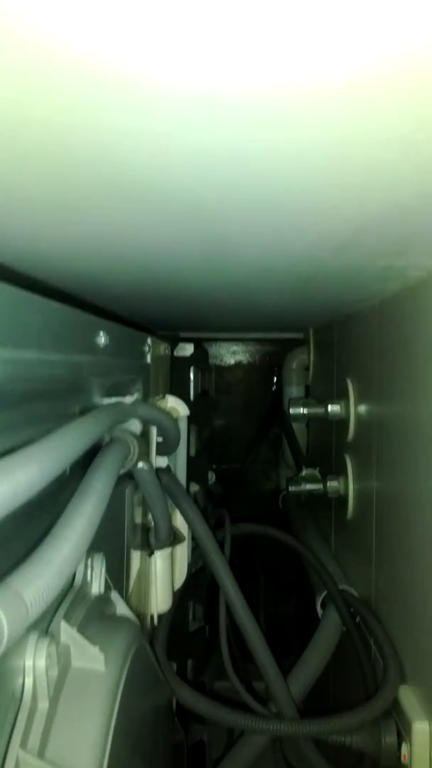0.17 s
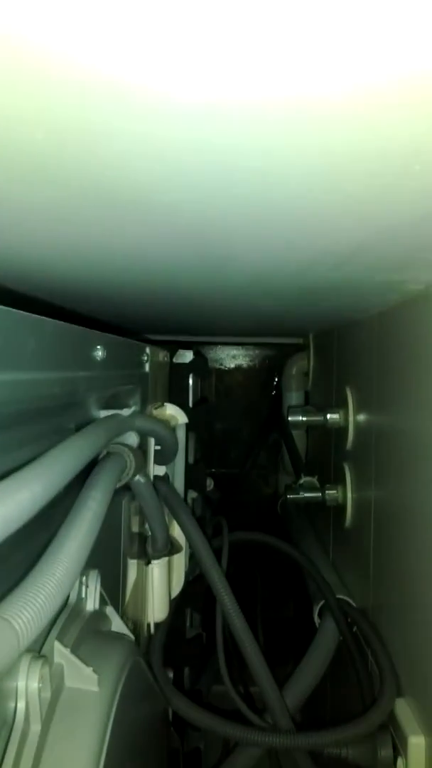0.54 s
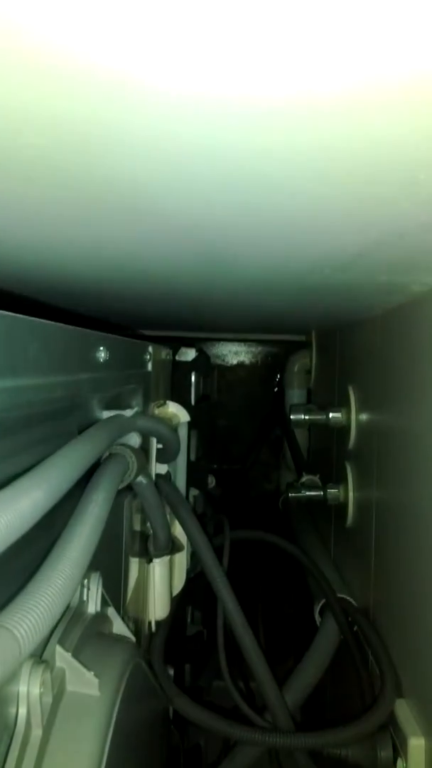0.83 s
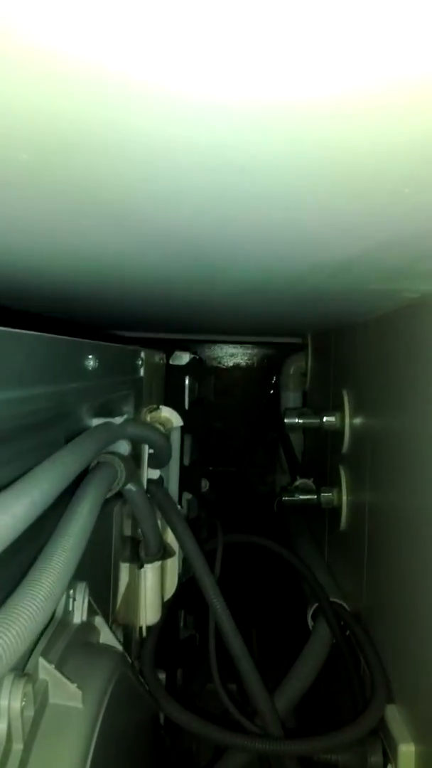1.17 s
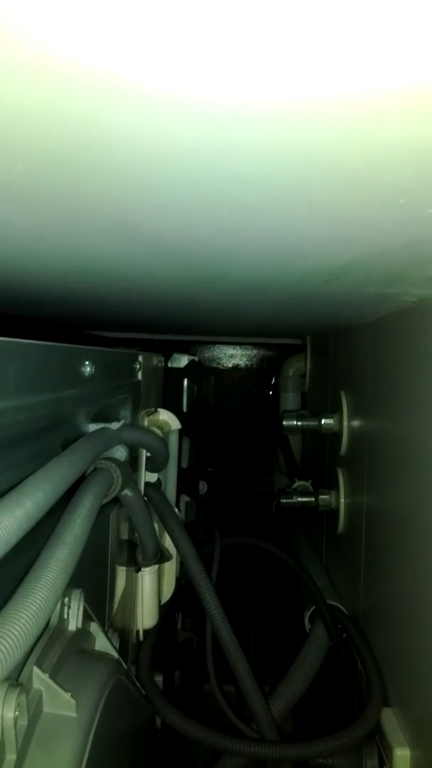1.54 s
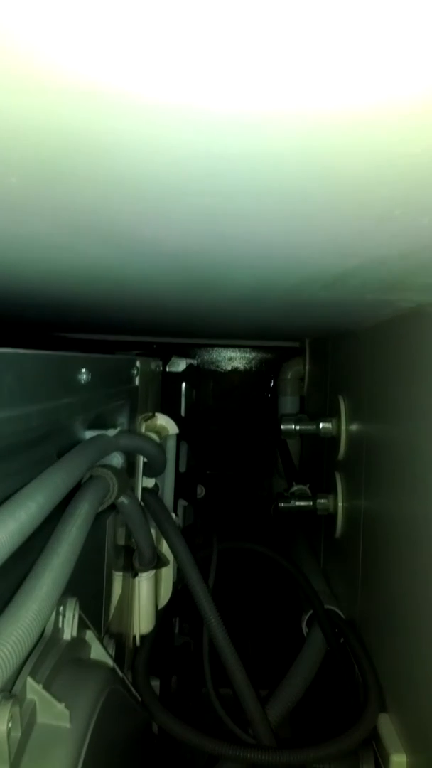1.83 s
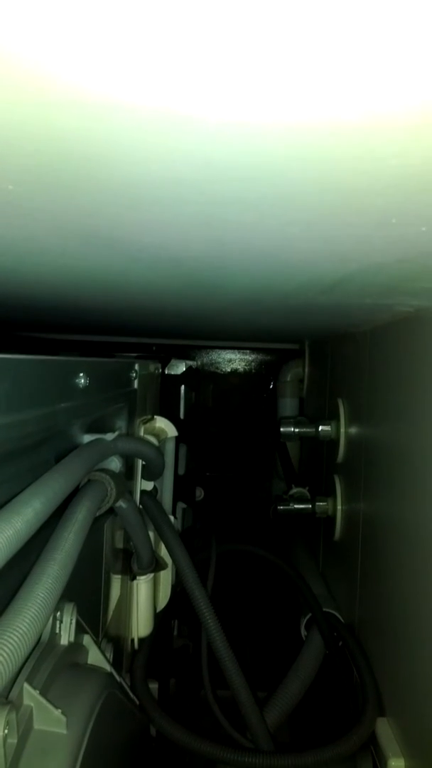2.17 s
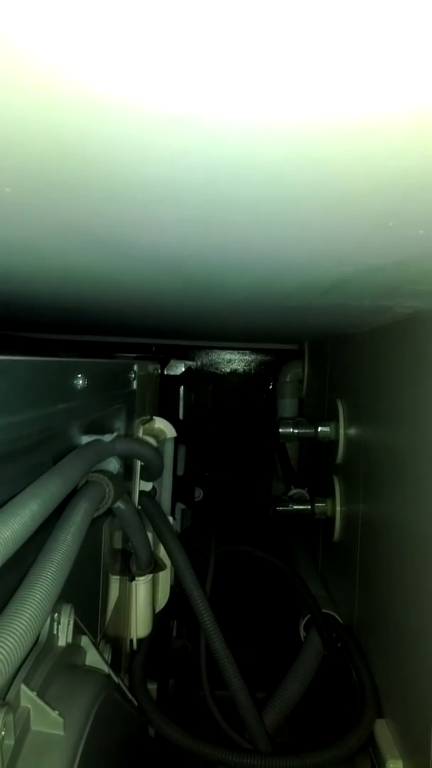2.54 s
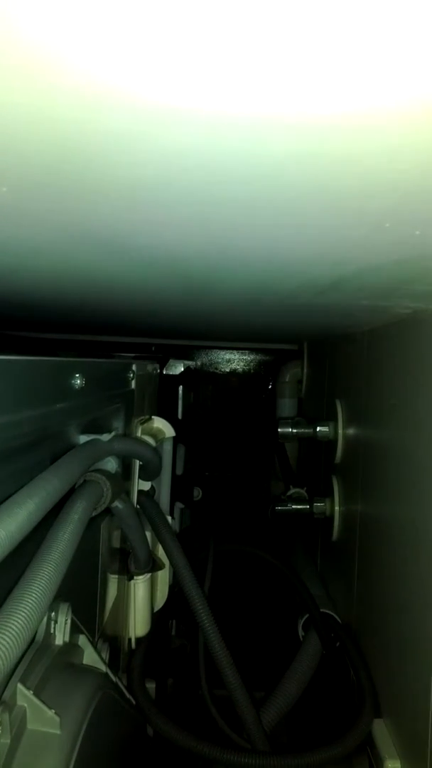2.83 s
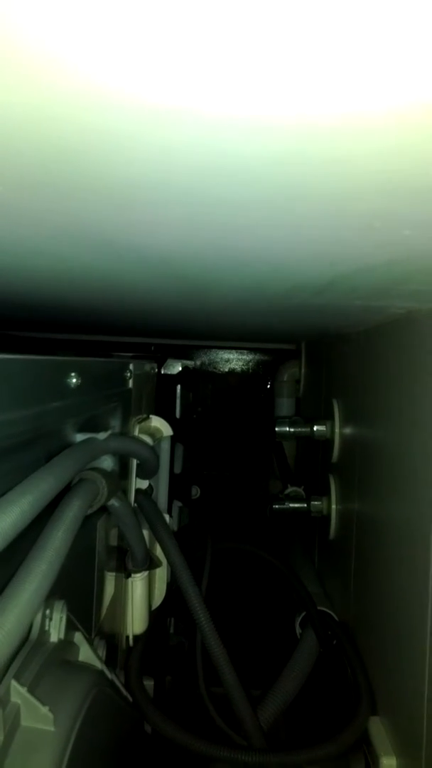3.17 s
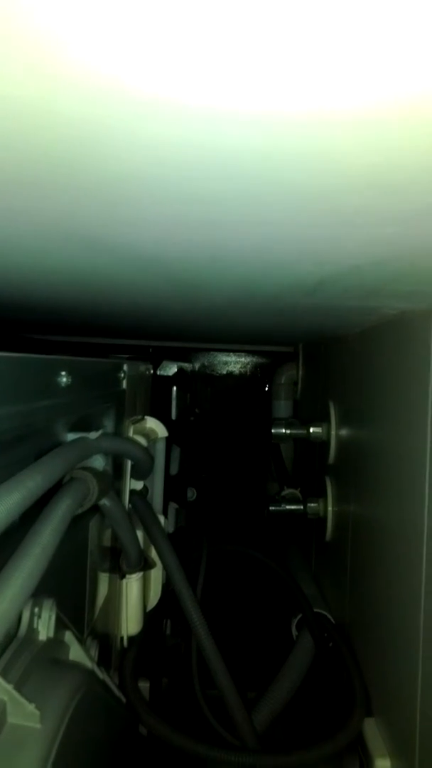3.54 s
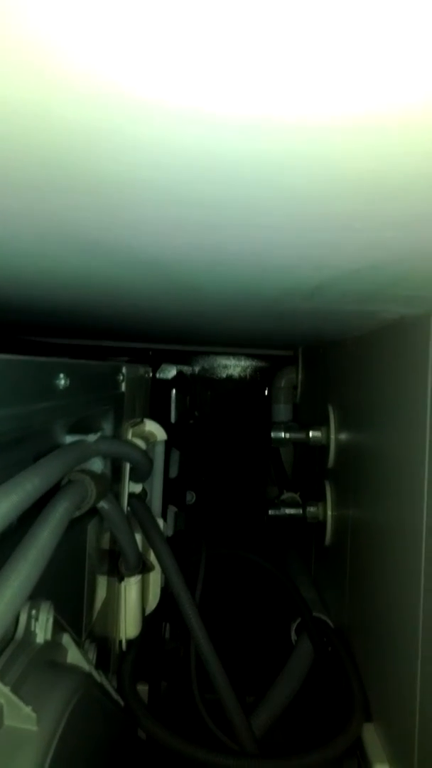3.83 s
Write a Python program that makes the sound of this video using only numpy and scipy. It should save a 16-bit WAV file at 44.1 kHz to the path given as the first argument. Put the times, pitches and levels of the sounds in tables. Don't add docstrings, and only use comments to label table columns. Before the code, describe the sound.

A washing machine drain pump hums low and buzzy with rushing, fizzing water, small drips, spits and squeaks from 0 to 2.0 seconds. It cuts out, its hum ringing down while water gurgles back in hollow gulps until about 2.7. A sharp plastic click follows at 2.74, a panel knock at 3.34, a fainter one at 3.53. Quiet compressor drone, rapid ticking and valve hiss continue throughout, close in a narrow gap.

```python
import sys
import numpy as np
from scipy import signal
from scipy.fft import rfft, irfft
from scipy.io import wavfile

SR = 44100
rng = np.random.default_rng(int(sys.argv[2]) if len(sys.argv) > 2 else 0)


def dump_mix(stems):
    frames = np.atleast_2d(stems).T
    limited = np.clip(frames, -1, 1)
    pcm = np.round(limited * 32767).astype(np.int16)
    wavfile.write(sys.argv[1], SR, pcm)


def boost(x):
    u = np.asarray(x, float) / 20
    return 10 ** u


N = 176400
T = np.arange(N) / SR

HUM_HZ = 99.78
PUMP_OFF_S, FLOW_OFF_S = 2.022, 2
FLOW_FALL_S, CHURN_FALL_S = 0.02, 0.07
PUMP_LEAD_RAD, DRONE_LAG_RAD, ROTOR_LAG_RAD = 1.43, 2.44, .6
FIRST_DROP_DB, FIRST_DROP_S = -5, .04
HUM_LEFT_DB = -51
TICK_HZ, TICK_FIRST_S = 15.35, .0163
RUSH_DB, FIZZ_DB, FIZZ_PER_S, CHURN_DB = -41.5, -50, 1300, -36.5
ROOM_LOW_DB, HISS_DB = -47.5, -45.5
GLUGS_PER_S, TRICKLE_PER_S = 490, 2600
LOW_MODES_HZ, LOW_LAG_S = 1150, .006
PANEL_RISE_S, CLIP_RISE_S = .004, .001
SWELL_S, GLIDE, POCKET_DB = .009, 0.017, -0.5

# (multiple of hum, level/dB rms, ring-down t60/s, wobble/dB)
PUMP_PARTIALS = [(1, -22, 1.2, 0.1), (2, -30.5, 2.72, -1.5), (3, -34, 0.2, 2), (4, -49, 0.37, 0.2),
                 (5, -58, .3, 2.5), (6, -74, .3, 0), (7, -62, .3, 2.5)]
# (multiple of hum, level/dB)
DRONE_PARTIALS = [(1, -53), (3, -42), (4, -54.5), (5, -63.5)]
# (f/Hz, level/dB, sense of swing)
ROTOR_LINES = [(42.18, -56, 1), (48.66, -41, 1), (94.19, -47.5, -1)]
# (f/Hz, level/dB, wobble/dB)
WINDING_WHINE = [(146, -66, 2.1), (276, -62, 2.5), (452.4, -66, 2.5), (3492, -67, 2.2), (3866, -69, 3.5),
                 (5553, -66, 3)]
# (f/Hz, level/dB, t60/s, lag/s)
TICK_PARTS = [(1905, -59, 0.1, .002), (1965, -58, 0.11, .006), (2905, -57, 0.06, 0),
              (3870, -62, 0.14, .045), (4870, -57, 0.042, 0)]
# (f/Hz, level/dB per Hz)
RUSH_SPECTRUM = [(290, -15), (500, -7.5), (652, -18), (716, 1.5), (1170, -6), (3220, 1), (4730, -2),
                 (5780, -7.5), (12000, -11), (15600, -9), (22000, -120)]
# (t/s, level/dB)
FLOW_SURGE = [(0, -41.5), (.05, -43), (.15, -40.5), (.27, -43.5), (.36, -42), (.44, -41.5), (.52, -42.5),
              (.6, -42.5), (.8, -41), (.88, -40.5), (.98, -43), (1.07, -42), (1.17, -42.5), (1.45, -42),
              (1.58, -44), (1.8, -41), (1.9, -42.5), (2, -44)]
# (f/Hz, level/dB per Hz)
CHURN_SPECTRUM = [(40, -24), (70, 2), (125, -7), (165, 5), (245, -8.5), (355, -6.5), (450, -15),
                  (700, -22.5)]
# (f/Hz, level/dB)
CHURN_LUMPS = [(152, -47), (170, -48.5), (220, -48), (358, -49.5)]
# (f/Hz, level/dB per Hz)
ROOM_SPECTRUM = [(15, -14), (40, 1.5), (68, 6), (150, -14.5), (280, -3.5), (420, -10.5), (570, -5.5),
                 (780, -24)]
# (f/Hz, level/dB per Hz)
HISS_SPECTRUM = [(700, -15.5), (1200, -8), (2200, -12.5), (5300, -9), (6800, -15.5), (12000, -10),
                 (13600, -1), (15700, -6)]
# (f/Hz, width/Hz, level/dB)
GAP_PEAKS = [(557, 45, 6.5), (1140, 300, 3.5), (2480, 44, 9), (4120, 320, 3), (5800, 50, -5),
             (7190, 110, 9), (8600, 200, 0.5), (8890, 270, 6), (11340, 250, 5.5), (11940, 250, 4.5),
             (13600, 440, 3), (14800, 310, 0.5), (15000, 350, 0.5)]
# (t/s, level/dB)
DRIP_HITS = [
    (.003, -41),
    (.684, -40),
]
# (f/Hz, level/dB, t60/s)
DRIP_RINGS = [(1027, 5.5, 0.16), (1360, -2, .1)]
# (t/s, level/dB)
HARD_HITS = [
    (3.3385, -27),
]
# (f/Hz, level/dB, t60/s)
HARD_RINGS = [(1046, -13, .25), (1620, 4, .035), (1357, 0, .13), (1420, -5, .12), (1468, -5, .1),
              (1525, -7, .12), (1595, -5, .13), (1690, -4, .14), (1722, 2, .12), (1776, -7, .38),
              (1883, -3, .24), (2043, -14, .12), (2176, -11, .12), (2492, -18, .15)]
# (t/s, level/dB)
SOFT_HITS = [
    (3.5297, -42),
]
# (f/Hz, level/dB, t60/s)
SOFT_RINGS = [(994, -3, .22), (1080, -5, .1), (1227, -9, .08), (1357, -1, .13), (1427, -1, .09),
              (1480, 3, .04), (1464, -1, .12), (1595, -7, .06), (1692, -9, .15)]
# (t/s, level/dB)
CLIP_HITS = [
    (2.7421, -31),
    (2.7428, -25),
]
# (f/Hz, level/dB, t60/s)
CLIP_RINGS = [(8900, -4, .008), (9700, 0, .013), (10500, -3, .008)]
# (t/s, level/dB, low f/Hz, high f/Hz, t60/s)
CRACKS = [(.13, -42, 2800, 3700, .3), (.135, -35, 9500, 16000, .12), (.508, -41, 2500, 3800, 0.14),
          (.855, -38, 2800, 4500, .15), (1.05, -45, 2700, 4200, .15), (1.892, -37, 1800, 4300, 0.11),
          (2.053, -35, 9400, 11300, .014), (2.11, -44.5, 3800, 5800, 0.17), (2.174, -40, 9000, 15700, 0.17),
          (2.265, -46, 5500, 8000, 0.11), (2.388, -44, 700, 4000, 0.15), (2.69, -49, 900, 3500, 0.35),
          (2.743, -38.5, 8400, 12400, .09), (2.742, -37, 4500, 15000, .02), (2.965, -40, 120, 250, .4),
          (3.339, -35, 2300, 6900, 0.12), (3.339, -41, 5150, 5270, .08), (3.338, -37, 1410, 1940, 0.48),
          (3.531, -46, 1300, 2600, 0.11)]
# (peak t/s, level/dB, f/Hz)
SEAL_SQUEAKS = [
    (.359, -41, 4587),
    (.363, -46, 3004),
    (.784, -47, 3671),
    (.255, -48, 1550),
]
# (peak t/s, level/dB, f/Hz)
SUMP_GULPS = [(2.107, -40, 388), (2.127, -36, 375), (2.197, -35, 385), (2.247, -29.5, 386),
              (2.259, -33, 219), (2.287, -31, 388), (2.319, -35, 207), (2.347, -38, 388), (2.347, -33, 205),
              (2.377, -30, 222), (2.405, -37, 398), (2.419, -44, 484), (2.424, -37, 170), (2.442, -40, 443),
              (2.46, -41, 445), (2.49, -37, 172), (2.524, -41, 161)]
# (peak t/s, level/dB, f/Hz)
HOSE_BUBBLES = [(2.113, -44.5, 590), (2.127, -46, 614), (2.127, -44, 790), (2.219, -45, 743),
                (2.243, -41, 710), (2.255, -41, 725), (2.271, -39, 750), (2.283, -54, 1100),
                (2.303, -43, 736), (2.305, -52, 1270), (2.305, -44, 1590), (2.319, -47, 1780),
                (2.331, -45, 732), (2.335, -46, 1540), (2.393, -36, 740), (2.395, -49, 1460),
                (2.395, -45, 1981), (2.395, -45, 896), (2.397, -45, 1124), (2.405, -45, 1470),
                (2.415, -48, 1174), (2.43, -49, 1740), (2.438, -45, 732), (2.454, -49, 1100),
                (2.48, -46, 1016), (2.48, -45, 1895), (2.486, -41, 734), (2.494, -50, 1012),
                (2.496, -49, 1443), (2.506, -47, 1044), (2.516, -45, 1270), (2.548, -42.5, 1152),
                (2.554, -44, 710), (2.58, -49, 1087), (2.61, -49, 1110), (2.616, -46, 1787)]
# (t/s, level/dB, trickle level/dB)
BACKFLOW_COURSE = [
    (2.07, -53, -2),
    (2.11, -40.5, -8.5),
    (2.19, -39.5, -11),
    (2.29, -39.5, -6),
    (2.37, -42, -9),
    (2.395, -39.5, -4),
    (2.5, -39.5, -5.5),
    (2.6, -46, -2.5),
    (2.85, -59.5, -3),
]
# (f/Hz, level/dB, t60/s)
SUMP_RINGS = [(147, -4.5, 0.056), (180, -8, 0.034), (235, -9, 0.047), (326, -2, 0.063), (398, -12, 0.076),
              (453, -6, 0.043), (584, -12, 0.026), (733, -9.5, 0.063)]


def rms_one(x):
    return x / np.sqrt(np.mean(x ** 2) + 1e-20)


def drift(rate_hz):
    r = np.exp(-80 * np.pi * rate_hz / SR)
    noise = rng.standard_normal(N // 40 + 2002)
    slow = signal.lfilter([1], [1, -2 * r, r * r], noise)[2000:]
    return np.interp(np.arange(N) / 40, np.arange(len(slow)), rms_one(slow))


def ring(clicks, hz, t60):
    r, w = boost(-60 / (t60 * SR)), 2 * np.pi * hz / SR
    return signal.lfilter([0, np.sin(w)], [1, -2 * r * np.cos(w), r * r], clicks + 1e-18)


def coloured(spectrum, patchy_db):
    hz = np.fft.rfftfreq(N, 1 / SR) + 1
    at, db = np.transpose(spectrum)
    curve = np.interp(np.log(hz), np.log(at), db, -90, -90)
    shaped = rfft(rng.standard_normal(N)) * boost(curve)
    out, together = 0, drift(19.0)
    for centre in np.arange(np.log2(at[0]), np.log2(at[-1]) + .5, .5):
        window = np.clip(1 - 2 * abs(np.log2(hz) - centre), 0, 1)
        band = irfft(shaped * window, N)
        out = out + band * boost(patchy_db * (0.17 * together + drift(10.5)))
    return rms_one(out)


def grains(per_s, spread_db):
    sizes = boost(spread_db * np.minimum(rng.exponential(1, N), 4)) * rng.choice([-1, 1], N)
    return sizes * (rng.random(N) < per_s / SR)


def bubble_bank(born, pitches_hz, cycles):
    dealt = rng.integers(0, len(pitches_hz), N)
    return sum(ring(born * (dealt == k), hz, cycles / hz) for k, hz in enumerate(pitches_hz))


def pump():
    after = np.maximum(T - PUMP_OFF_S, 0)
    step = FIRST_DROP_DB * (1 - np.exp(-after / FIRST_DROP_S))
    phase = 2 * np.pi * HUM_HZ * T + PUMP_LEAD_RAD
    out = np.zeros(N)
    for k, db, t60, wobble_db in PUMP_PARTIALS:
        level = boost(db + step - 60 * after / t60 + wobble_db * drift(2.6))
        if k == 2:
            level = level - boost(HUM_LEFT_DB)
        out -= np.sqrt(2) * level * np.sin(k * phase)
    return out


def compressor():
    out = np.zeros(N)
    for k, db in DRONE_PARTIALS:
        out += boost(db + 0.79 * drift(8.7)) * np.sin(k * (2 * np.pi * HUM_HZ * T - DRONE_LAG_RAD))
    for hz, db, sense in ROTOR_LINES:
        out += sense * boost(db + 0.2 * drift(2.2)) * np.sin(2 * np.pi * hz * T - ROTOR_LAG_RAD)
    for hz, db, wobble_db in WINDING_WHINE:
        out += boost(db + wobble_db * drift(8.2)) * np.sin(2 * np.pi * hz * T)
    at = (np.arange(TICK_FIRST_S, N / SR, 1 / TICK_HZ) * SR).astype(int)
    for hz, db, t60, lag in TICK_PARTS:
        clicks = np.zeros(N)
        late = (SR * (lag + rng.uniform(0, .004, len(at)))).astype(int)
        clicks[(at + late) % N] = boost(db + rng.normal(0, 1.6, len(at)))
        out += ring(clicks, hz, t60)
    return np.sqrt(2) * out


def outflow():
    s, db = np.transpose(FLOW_SURGE)
    surge = boost(np.interp(T, s, db - db.mean()))
    flowing = np.exp(-np.maximum(T - FLOW_OFF_S, 0) / FLOW_FALL_S)
    churning = np.exp(-np.maximum(T - PUMP_OFF_S, 0) / CHURN_FALL_S)
    born = grains(FIZZ_PER_S * boost(2.5 * drift(8)), 4.1)
    fizz = bubble_bank(born, np.geomspace(1500, 5200, 16), 14)
    rush = boost(RUSH_DB) * coloured(RUSH_SPECTRUM, patchy_db=1.4) + boost(FIZZ_DB) * rms_one(fizz)
    churn = boost(CHURN_DB) * coloured(CHURN_SPECTRUM, patchy_db=0.0)
    for hz, db in CHURN_LUMPS:
        lump = rms_one(ring(rng.standard_normal(N), hz, 0.22))
        churn = churn + lump * boost(db + 2.4 * drift(1.4))
    return flowing * surge * rush + churning * churn


def gap(x):
    hz = np.fft.rfftfreq(N, 1 / SR)
    peaks_db = sum(db / (1 + (2 * (hz - at_hz) / wide) ** 2) for at_hz, wide, db in GAP_PEAKS)
    return irfft(rfft(x) * boost(peaks_db), N)


def room_and_valve():
    room = boost(ROOM_LOW_DB) * coloured(ROOM_SPECTRUM, patchy_db=3.0)
    hiss = boost(HISS_DB) * coloured(HISS_SPECTRUM, patchy_db=1.1)
    return gap(room + hiss)


def knocks(hits, modes, rise):
    clicks, rings = np.zeros(N), np.zeros(N)
    for s, db in hits:
        clicks[int(s * SR)] = boost(db)
    for hz, db, t60 in modes:
        mode = ring(clicks, hz, t60) - ring(clicks, hz, rise)
        lag = int((hz < LOW_MODES_HZ) * LOW_LAG_S * SR)
        rings += boost(db) * np.roll(mode, lag)
    return signal.sosfilt(signal.butter(4, 1.0 * modes[0][0], "high", fs=SR, output="sos"), rings)


def cracks():
    out, white = np.zeros(N), rng.standard_normal(N)
    t = T[:SR // 3]
    for s, db, low_hz, high_hz, t60 in CRACKS:
        i = int(s * SR)
        sos = signal.butter(2, [low_hz, high_hz], "band", fs=SR, output="sos")
        band = signal.sosfilt(sos, white[i:i + len(t)])
        onset = np.minimum(t * low_hz / 4, 1)
        out[i:i + len(t)] += boost(db - 60 * t / t60) * onset * rms_one(band)
    return out


def air_pockets():
    out = np.zeros(N)
    for s, db, hz in SUMP_GULPS + HOSE_BUBBLES + SEAL_SQUEAKS:
        rise = SWELL_S * (400 / hz) ** .3
        i = int((s - 1.3 * rise) * SR)
        u = T[:SR // 8] / rise
        swell = boost(db + POCKET_DB) * u * np.exp(1 - u)
        climb = 1 + GLIDE * (u / 2 - 1.3)
        out[i:i + len(u)] += swell * np.sin(2 * np.pi * hz * rise * u * climb)
    return out


def backflow():
    s, db, bright_db = np.transpose(BACKFLOW_COURSE)
    glugs = np.zeros(N)
    for hz, mode_db, t60 in SUMP_RINGS:
        struck = ring(grains(GLUGS_PER_S / 3, 2.8), hz, t60)
        glugs += boost(mode_db) * rms_one(ring(struck, hz, t60 / 3))
    born = grains(TRICKLE_PER_S * boost(1.5 * drift(25)), 2.6)
    trickle = rms_one(bubble_bank(born, np.geomspace(850, 3800, 14), 22))
    level = boost(np.interp(T, s, db, -120, -120))
    return level * (rms_one(glugs) + boost(np.interp(T, s, bright_db)) * trickle)


def scene():
    hits = knocks(DRIP_HITS, DRIP_RINGS, PANEL_RISE_S)
    hits += knocks(CLIP_HITS, CLIP_RINGS, CLIP_RISE_S)
    hits += knocks(HARD_HITS, HARD_RINGS, PANEL_RISE_S)
    hits += knocks(SOFT_HITS, SOFT_RINGS, PANEL_RISE_S)
    machines = pump() + compressor()
    water = outflow() + air_pockets() + backflow()
    return (machines + water + room_and_valve() + hits + cracks())[None]


def band_limit(x):
    return signal.sosfilt(signal.butter(12, 15660, fs=SR, output="sos"), x)


def record(dry):
    return band_limit(dry)


dry = scene()
out = record(dry)
dump_mix(out)
```